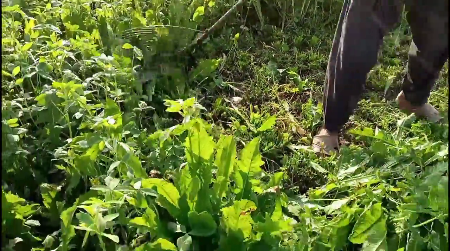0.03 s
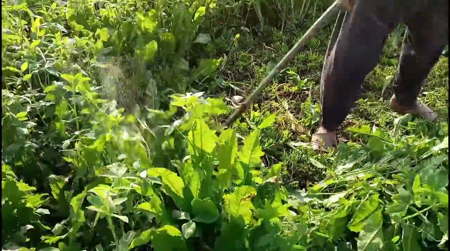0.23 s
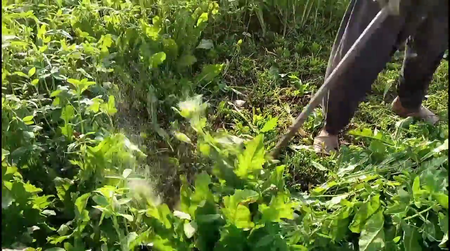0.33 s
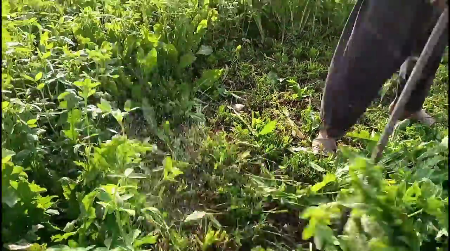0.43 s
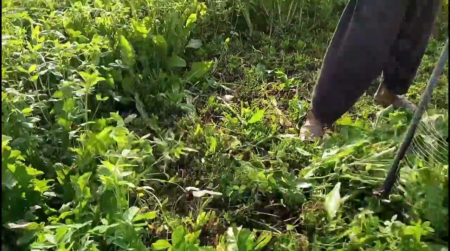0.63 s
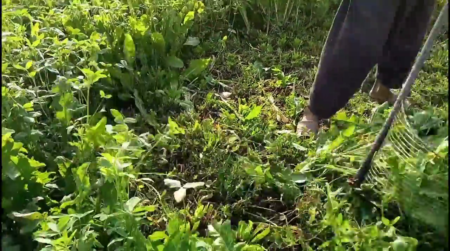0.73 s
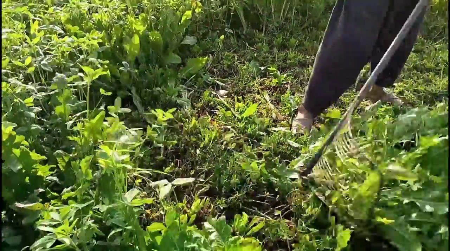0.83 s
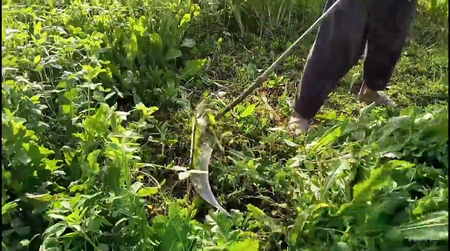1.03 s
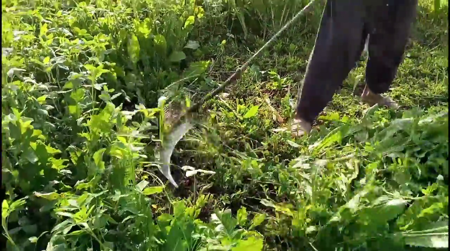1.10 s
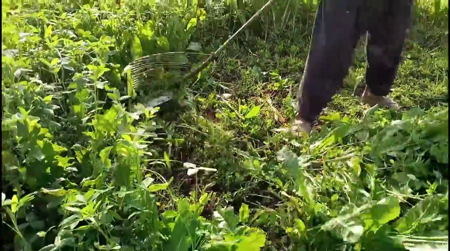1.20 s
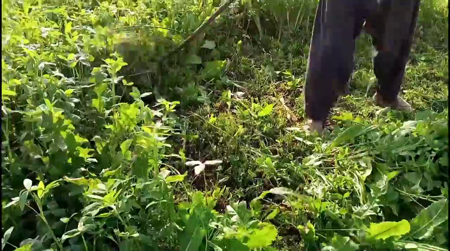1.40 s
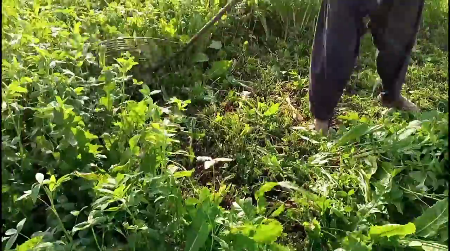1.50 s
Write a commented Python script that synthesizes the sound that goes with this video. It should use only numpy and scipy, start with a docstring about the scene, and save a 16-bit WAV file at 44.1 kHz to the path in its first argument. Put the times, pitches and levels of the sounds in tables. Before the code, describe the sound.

One crunching scythe stroke through green plants, followed by a softer rustling return swing.

```python
"""A scythe mows leafy fodder in an open field, over a light breeze.
The wooden handle knocks and the blade sweeps into the stand: stems snap by the hundred, the steel
rings faintly, and the crunch dulls as the cut leaves slide into the swath.
Then the scythe swings back, brushing the stubble, scraping leaves and ticking against stalks.
Feet and the blade's heel thud softly on the soil along the way."""
import sys
import numpy as np
from scipy import signal
from scipy.fft import rfft, irfft, next_fast_len
from scipy.io import wavfile

SR = 44100
rng = np.random.default_rng(int(sys.argv[2]) if len(sys.argv) > 2 else 0)


def wav_record(signal):
    """Record a signal, one row per channel, as 16-bit PCM in the file named by sys.argv[1]."""
    frames = np.transpose(np.atleast_2d(signal))
    bounded = np.clip(frames, -1, 1)
    # unit amplitude maps onto the largest positive 16-bit level
    quanta = np.round(bounded * 32767).astype(np.int16)
    wavfile.write(sys.argv[1], SR, quanta)


N = 68355

# envelopes of the cut, before trims: (time [s], stem crunch [dB], leaf rush [dB], fizz [dB])
CUT_ENVELOPES = [(0.16, -67, -106, -77.5), (0.21, -45.5, -73, -65.5), (0.234, -56, -67, -77),
                 (0.245, -50, -61, -67.5), (0.312, -39.5, -50.5, -54.5), (0.33, -39.5, -54.5, -58),
                 (0.34, -41.5, -48, -53.5), (0.352, -37.5, -48.5, -49.5), (0.388, -40, -44.5, -60),
                 (0.418, -33, -51, -42), (0.426, -37, -45, -50), (0.444, -30, -42, -42),
                 (0.496, -36, -41.5, -58.5), (0.514, -41, -49, -57), (0.546, -42, -46.5, -54.5),
                 (0.57, -42, -48, -66), (0.626, -43.5, -49.5, -70), (0.682, -52.5, -60, -76),
                 (0.736, -53, -59.5, -79.5), (0.78, -64.5, -68, -94)]
CRUNCH_TRIM_DB, RUSH_TRIM_DB, CUT_FIZZ_TRIM_DB = 0.1, 0, 1
# envelopes of the return, before trims: (time [s], rustle [dB], low brushing [dB], fizz [dB])
SWING_ENVELOPES = [(0.79, -63.5, -71, -92), (0.864, -62.5, -81, -91), (0.92, -63.5, -68, -87),
                   (0.99, -57.5, -69, -83.5), (1.06, -56, -63.5, -77.5), (1.08, -50.5, -66, -73),
                   (1.125, -54.5, -63, -77), (1.145, -51, -64.5, -68), (1.25, -54.5, -66, -76),
                   (1.325, -67, -84, -92), (1.398, -63.5, -79, -85), (1.456, -57.5, -74, -87),
                   (1.55, -64.5, -78, -82.5)]
RUSTLE_TRIM_DB, BRUSHING_TRIM_DB, SWING_FIZZ_TRIM_DB = 1, 4, 7

# tone of each layer: (frequency [Hz], relative level [dB])
CRUNCH_EQ = [(710, -23.5), (1200, -9), (1730, -14), (1910, -9), (2220, -0.5), (2470, -2), (2950, -2.5),
             (3720, -4.5), (5160, -3), (6980, -15), (8500, -52), (11000, -56), (18700, -120)]   # stems breaking
SWATH_EQ = [(710, -43), (1200, 3), (1520, -0.5), (1790, 3), (2970, 5), (4600, -2.5), (6420, -9.5),
            (7300, -29), (9490, -60), (16100, -120)]   # cut leaves sliding
RUSH_EQ = [(25, -66), (50, -12.5), (85, -7), (160, -1.5), (290, -5.5), (400, -2), (510, 2), (640, -4.5),
           (790, 0.5), (1050, -6.5), (1300, -12), (1800, -12.5), (3000, -26.5)]   # body of the moving leaf mass
FIZZ_EQ = [(6000, -10.5), (8200, -4), (10500, 1.5), (13500, -3.5), (14900, 9), (16000, 0.5)]   # top end of the crackle
SNAP_EQ = [(200, -16), (1000, -9.5), (2500, 4), (4000, 0.5), (5800, -2), (8000, -24.5), (11000, -51),
           (15000, -11)]   # one dry stem
RUSTLE_EQ = [(710, -43), (1200, -12), (1510, -13.5), (1870, -9.5), (2200, -3), (3730, -6.5), (4060, -5),
             (6190, -16), (7500, -29.5), (9750, -70), (16500, -120)]   # leaves on the back swing
BRUSHING_EQ = [(150, -5), (290, -16), (400, -7), (520, -3), (650, -9.5), (800, -1), (1100, -13.5),
               (1500, -5), (2500, -47)]   # low sweep through the stubble
FIELD_EQ = [(200, -12), (330, -20.5), (500, -11.5), (700, -16), (900, -7.5), (1200, -15.5), (1700, -5),
            (2600, -1.5), (4800, -4), (6200, -12.5), (7400, -43), (10500, -37.5), (13500, -51),
            (15300, -35)]   # faint stir of the field
BREEZE_EQ = [(20, -58), (40, -23), (70, -3), (110, -4), (170, -12.5), (300, -33.5), (800, -59)]   # wind rumble

# modes of the steel blade: (frequency [Hz], relative level [dB])
BLADE_MODES = [(1958, 2.5), (2180, -3), (2280, 6), (2355, -1), (2610, 4), (2680, 5), (2865, -3), (3027, -6),
               (3423, 0), (4690, 5.5)]
# thick stems snapping: (time [s], peak [dB])
STEM_SNAPS = [(0.2709, -18.5), (0.2733, -24.5), (0.356, -24), (0.404, -20), (0.413, -24), (0.433, -17.5),
              (0.4867, -23), (0.6339, -31), (1.1738, -30.5)]
# sharp ticks of the blade on stalks, and one hollow knock of the wooden handle:
# (time [s], crackle peak [dB], tick level [dB], pitch [Hz], t60 [s])
SCYTHE_KNOCKS = [(0.024, -49, -62, 3970, 0.019), (0.068, -58, -54, 1626, 0.043),
                 (0.2428, -39, -40, 3426, 0.1), (0.3137, -37, -37, 5120, 0.043),
                 (0.325, -34, -39, 840, 0.077), (1.1411, -36, -38, 4070, 0.046),
                 (1.2462, -43, -48, 4720, 0.035), (1.339, -48, -50.5, 3920, 0.024),
                 (1.4078, -40.5, -54, 2880, 0.022), (1.467, -43, -68, 2670, .04)]
# leaves scraping the steel: (peak time [s], half length [s], level [dB], pitch [Hz], bandwidth [Hz])
LEAF_SCRAPES = [(0.78, 0.038, -57.5, 1771, 342), (0.887, 0.013, -55.5, 1780, 660),
                (1.083, 0.0054, -61, 11040, 1810), (1.313, 0.048, -57, 1705, 232)]
# jolts as the stroke starts and as the blade meets the stand: (time [s], strength [dB])
HANDLE_JOLTS = [(0.004, -64.5), (0.201, -52)]
# modes of the wooden handle: (frequency [Hz], gain [dB])
HANDLE_MODES = [(525, -7), (915, -6.5), (1060, -6.5)]
# feet and the blade's heel on the soil: (peak time [s], level [dB], pitch [Hz])
SOIL_THUDS = [(0.174, -63, 101), (0.324, -54, 95), (0.39, -54.5, 84.6), (0.921, -57.5, 73),
              (1.009, -57, 100.6), (1.191, -63, 89), (1.397, -59.5, 75), (1.466, -63.5, 122)]


def from_db(db):
    """Decibels to gain."""
    return 10 ** (np.asarray(db) / 20)


def rms_one(x):
    """Scale to unit rms."""
    return x / np.sqrt(np.mean(x ** 2) + 1e-20)


def envelopes(rows, fade_s=0.02):
    """Gain curves from rows of (time [s], level [dB], ...), fading out beyond both ends."""
    times, *columns = np.transpose(rows)
    t = np.arange(N) / SR
    gate = np.clip(1 + np.minimum(t - times[0], times[-1] - t) / fade_s, 0, 1)
    return [gate * from_db(np.interp(t, times, db)) for db in columns]


def colour(x, eq):
    """Minimum-phase EQ through points of (frequency [Hz], level [dB])."""
    size = next_fast_len(2 * N)
    hz, db = np.transpose(eq)
    freqs = np.maximum(np.arange(size // 2 + 1) * SR / size, 1)
    response = from_db(np.interp(np.log(freqs), np.log(hz), db))
    cepstrum = irfft(np.log(response), size)
    cepstrum[1:size // 2] *= 2
    cepstrum[size // 2 + 1:] = 0
    return irfft(rfft(x, size) * np.exp(rfft(cepstrum)), size)[:N]


def cutting_stroke(swath_from_s=0.31, swath_full_s=0.63):
    """A dense crunch of snapping stems dulls to a slide as cut leaves pile up on the blade."""
    crunch_env, rush_env, fizz_env = envelopes(CUT_ENVELOPES)
    fibres = tearing(per_s=5000, spread_db=1.5)
    grains = rms_one(fibres + from_db(4) * crackle(per_s=2800, spread_db=1.5, hiss_db=1))
    crunch = rms_one(colour(grains, CRUNCH_EQ))
    slide = rms_one(colour(grains, SWATH_EQ))
    piled = np.interp(np.arange(N) / SR, [swath_from_s, swath_full_s], [0, 1])
    rush = rms_one(colour(crackle(per_s=700, spread_db=2.5, hiss_db=2), RUSH_EQ))
    fizz = rms_one(colour(crackle(per_s=1100, spread_db=4.5, hiss_db=-0.5), FIZZ_EQ))
    return (from_db(CRUNCH_TRIM_DB) * crunch_env * ((1 - piled) * crunch + piled * slide)
            + from_db(RUSH_TRIM_DB) * rush_env * rush
            + from_db(CUT_FIZZ_TRIM_DB) * fizz_env * fizz
            + blade_ring(crunch_env * grains))


def fractures(per_s, spread_db):
    """Tiny breaks as random clicks, many small and a few large."""
    breaks = rng.random(N) < per_s / SR
    return breaks * from_db(spread_db * np.minimum(rng.exponential(1, N), 5))


def tearing(per_s, spread_db, pitch_count=24, ring_cycles=15.6):
    """Fibres tear at random, each ringing briefly at one of many pitches; rms 1."""
    clicks = fractures(per_s, spread_db) * rng.choice([-1, 1], N)
    pitch_index = rng.integers(0, pitch_count, N)
    out = 0
    for k, hz in enumerate(np.geomspace(1000, 8500, pitch_count)):
        fibres = ring(clicks * (pitch_index == k), hz, ring_cycles / hz)
        out += np.sqrt(hz) * rms_one(fibres)   # evens out the energy per hertz
    return rms_one(out)


def crackle(per_s, spread_db, hiss_db, band_count=14):
    """Tiny fractures, each with its own size and colour, over the hiss of sliding leaves; rms 1."""
    clicks = fractures(per_s, spread_db)
    edges_hz = np.geomspace(250, 18000, band_count + 1)
    grains = 0
    for band in zip(edges_hz, edges_hz[1:]):
        bandpass = signal.butter(2, band, "band", fs=SR, output="sos")
        grains += signal.sosfilt(bandpass, clicks * rng.standard_normal(N))
    return rms_one(rms_one(grains) + from_db(hiss_db) * rng.standard_normal(N))


def ring(x, hz, t60):
    """One resonance: a unit click starts a dying sine of height 1."""
    r, w = np.exp(-np.log(1000) / (t60 * SR)), 2 * np.pi * hz / SR
    return signal.lfilter([0, np.sin(w)], [1, -2 * r * np.cos(w), r * r], x + 1e-18)


def blade_ring(drive, t60=0.2, relative_db=-12.5):
    """Every fracture at the edge sets the steel ringing, damped by the leaves."""
    steel = sum(from_db(db) * ring(drive, hz, t60) for hz, db in BLADE_MODES)
    return from_db(relative_db) * np.std(drive) * rms_one(steel)


def stem_snaps():
    """Each thick stem parts with one dry click."""
    clicks = sum(from_db(db) * signal.unit_impulse(N, int(s * SR)) for s, db in STEM_SNAPS)
    unit_peak = np.abs(colour(signal.unit_impulse(N), SNAP_EQ)).max()
    return colour(clicks, SNAP_EQ) / unit_peak


def back_swing():
    """The back of the blade brushes through stubble and standing leaves."""
    rustle_env, brushing_env, fizz_env = envelopes(SWING_ENVELOPES)
    grains = crackle(per_s=1700, spread_db=4, hiss_db=2.5)
    fibres = from_db(-9) * tearing(per_s=2200, spread_db=2.5)
    rustle = rms_one(colour(grains + fibres, RUSTLE_EQ))
    brushing = rms_one(colour(rng.standard_normal(N), BRUSHING_EQ))
    fizz = rms_one(colour(grains, FIZZ_EQ))
    return (from_db(RUSTLE_TRIM_DB) * rustle_env * rustle
            + from_db(BRUSHING_TRIM_DB) * brushing_env * brushing
            + from_db(SWING_FIZZ_TRIM_DB) * fizz_env * fizz)


def scythe_knocks(band_ratio=1.93):
    """The blade ticks on stalks and the handle knocks once: each a short ring in a dying crackle."""
    out, t = np.zeros(N), np.arange(N) / SR
    for s, crackle_db, tick_db, hz, t60 in SCYTHE_KNOCKS:
        decay = (t >= s) * np.exp(-np.log(1000) * np.maximum(t - s, 0) / t60)
        bandpass = signal.butter(2, [hz / band_ratio, hz * band_ratio], "band", fs=SR, output="sos")
        burst = signal.sosfilt(bandpass, colour(decay * rng.standard_normal(N), SNAP_EQ))
        tick = ring(signal.unit_impulse(N, int(s * SR)), hz, t60)
        out += from_db(tick_db) * tick + from_db(crackle_db) * burst / np.abs(burst).max()
    return out


def leaf_scrapes(sag_hz_per_s=700):
    """Leaves rub along the steel: thin bands of friction noise swell, sink a little and fade."""
    out, t = np.zeros(N), np.arange(N) / SR
    for s, half_s, db, hz, width_hz in LEAF_SCRAPES:
        lowpass = signal.butter(2, width_hz / 2, fs=SR, output="sos")
        friction = signal.sosfilt(lowpass, rng.standard_normal((2, N)))
        phase = 2 * np.pi * np.cumsum(hz - sag_hz_per_s * (t - s)) / SR
        scrape = rms_one(friction[0] * np.cos(phase) + friction[1] * np.sin(phase))
        swell = np.exp(-((t - s) / half_s) ** 2 / 2)
        out += from_db(db) * swell * scrape
    return out


def handle_knocks(t60=0.16):
    """A jolt makes the wooden handle sound, short and hollow."""
    jolts = sum(from_db(db) * signal.unit_impulse(N, int(s * SR)) for s, db in HANDLE_JOLTS)
    return sum(from_db(db) * ring(jolts, hz, t60) for hz, db in HANDLE_MODES)


def soil_thuds(half_s=0.018):
    """Weight on soft soil: a few low cycles that swell and fade."""
    out, t = np.zeros(N), np.arange(N) / SR
    for s, db, hz in SOIL_THUDS:
        swell = np.exp(-((t - s) / half_s) ** 2)
        out += from_db(db) * swell * np.sin(2 * np.pi * (hz * (t - s) + rng.random()))
    return out


def field_ambience(leaves_db=-62, breeze_db=-73, gust_db=2):
    """Leaves stir faintly over the low rumble of a gently gusting breeze."""
    leaves = rms_one(colour(crackle(per_s=860, spread_db=5.5, hiss_db=16.5), FIELD_EQ))
    gusts = np.interp(np.arange(N), np.linspace(0, N, 18), rng.standard_normal(18))
    breeze = rms_one(from_db(gust_db * gusts) * colour(rng.standard_normal(N), BREEZE_EQ))
    return from_db(leaves_db) * leaves + from_db(breeze_db) * breeze


def scene():
    """One stroke and its return in the open, in mono."""
    scythe = cutting_stroke() + stem_snaps() + back_swing() + scythe_knocks() + leaf_scrapes()
    return (scythe + handle_knocks() + soil_thuds() + field_ambience())[None]


def record(dry, cutoff_hz=15600):
    """A steep low-pass takes off the very top."""
    return signal.sosfilt(signal.ellip(16, 0.2, 80, cutoff_hz, fs=SR, output="sos"), dry)


dry = scene()
out = record(dry)
wav_record(out)
```